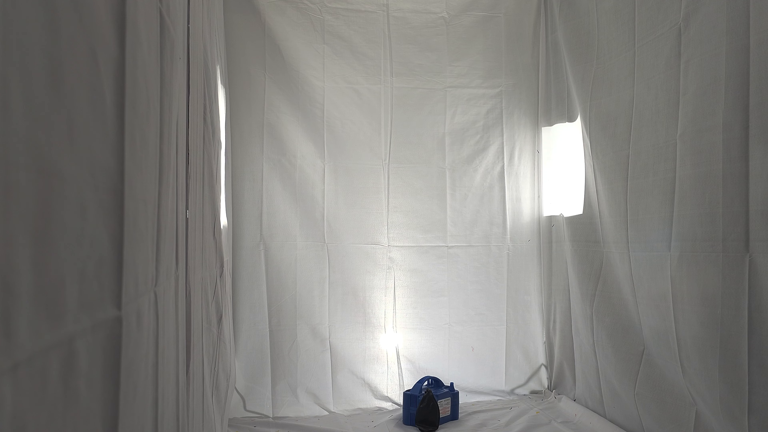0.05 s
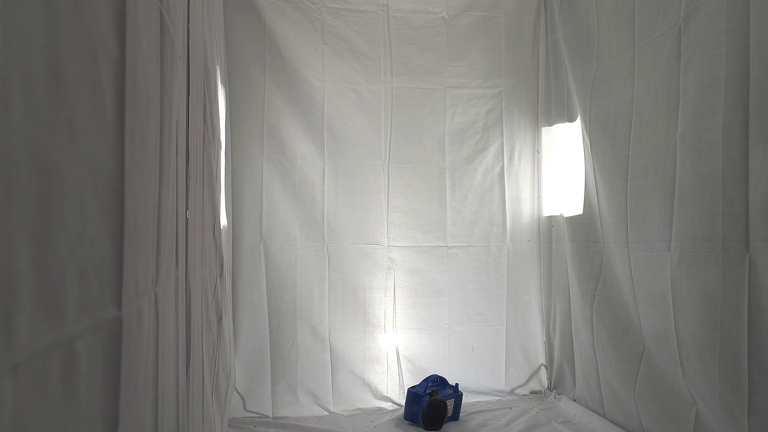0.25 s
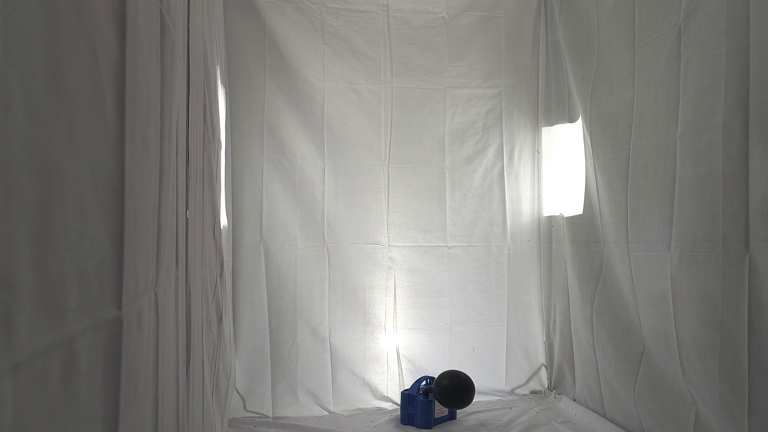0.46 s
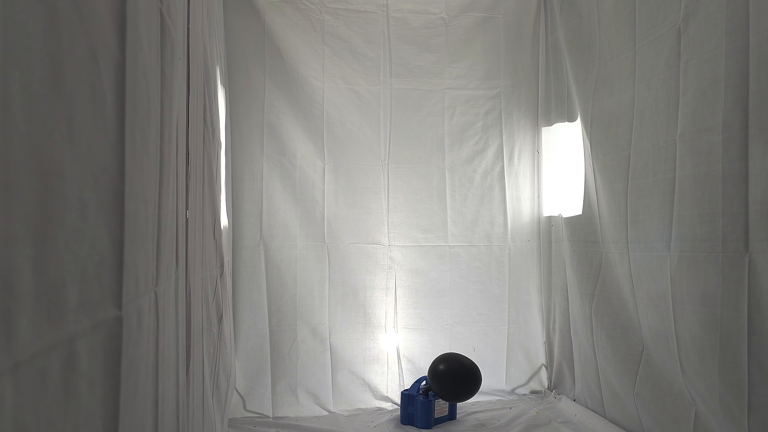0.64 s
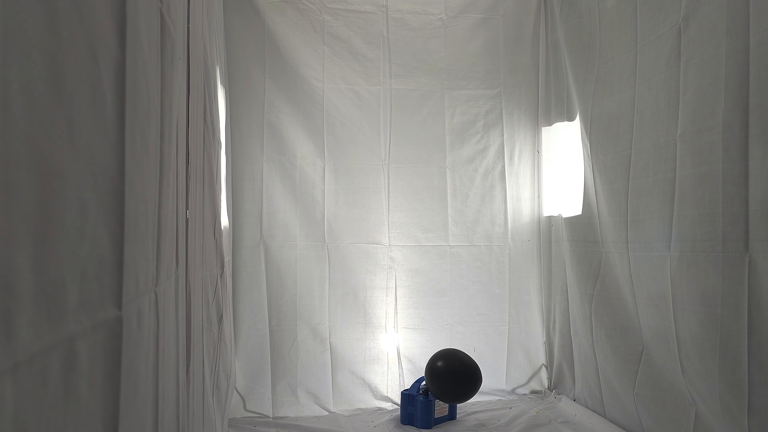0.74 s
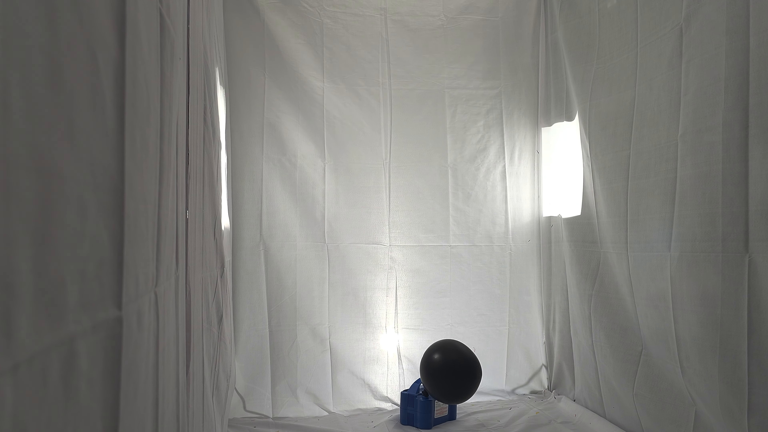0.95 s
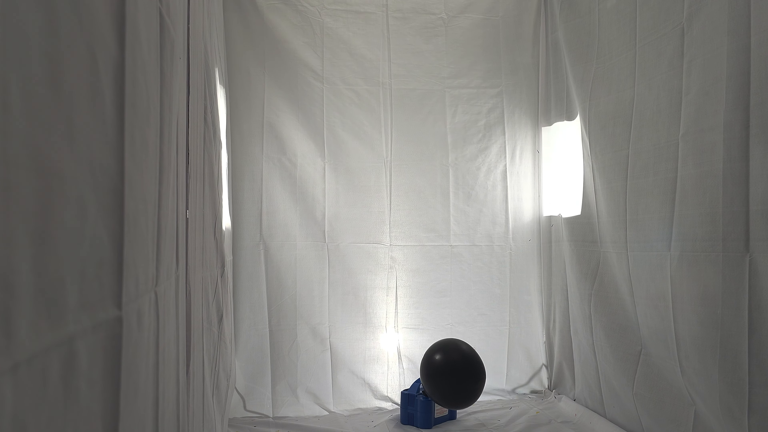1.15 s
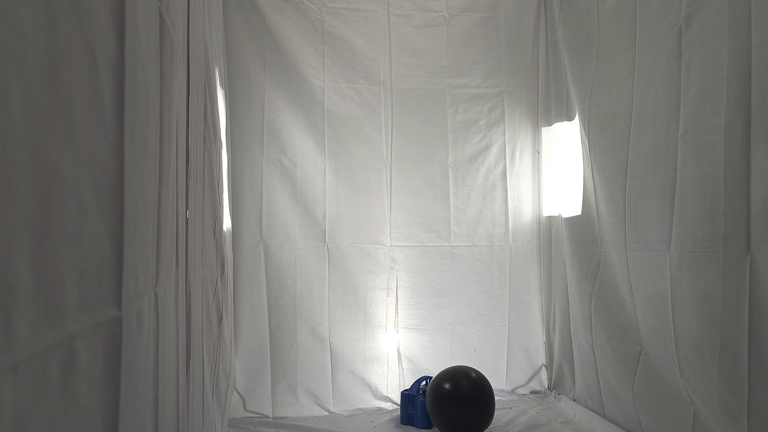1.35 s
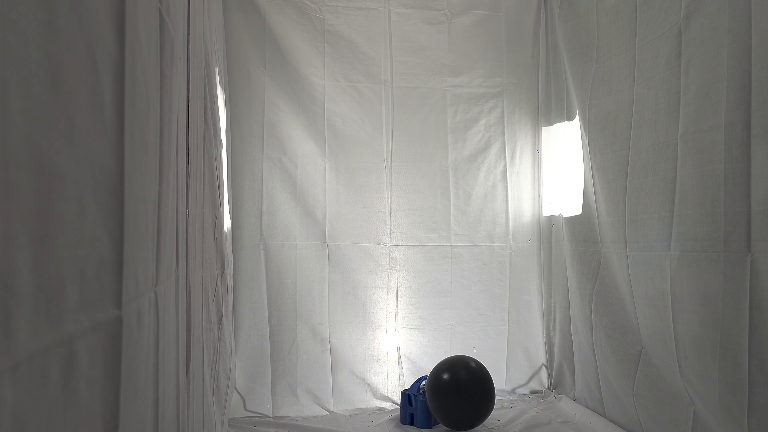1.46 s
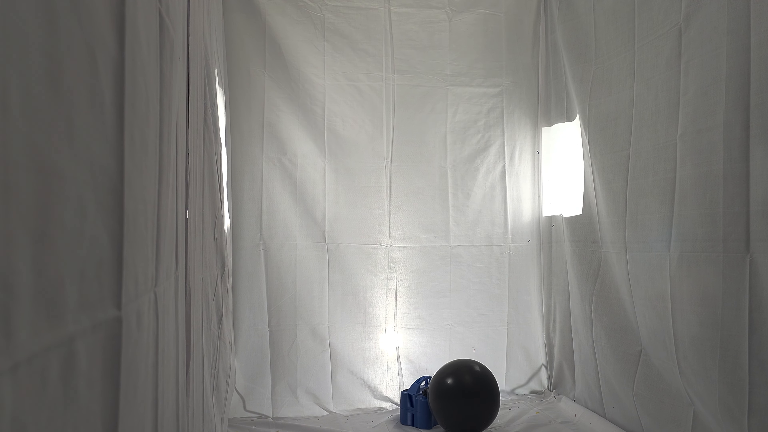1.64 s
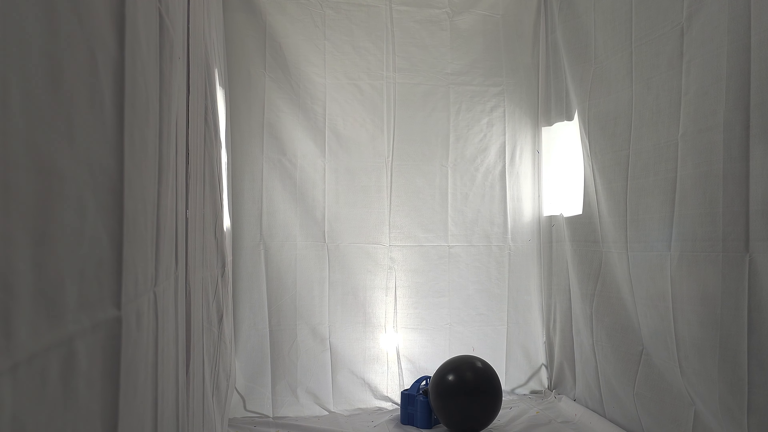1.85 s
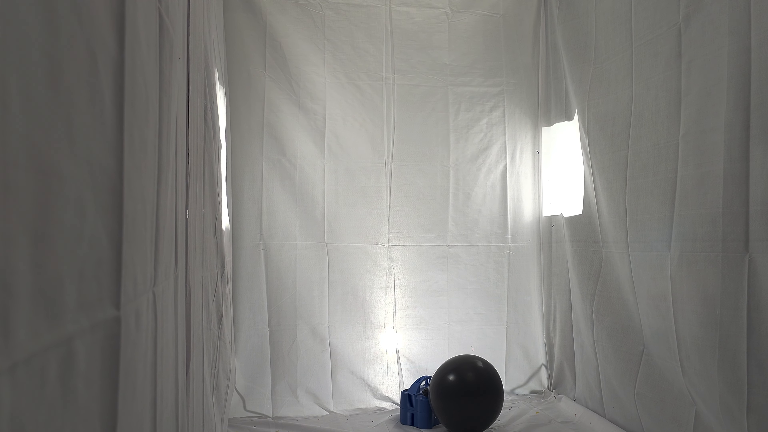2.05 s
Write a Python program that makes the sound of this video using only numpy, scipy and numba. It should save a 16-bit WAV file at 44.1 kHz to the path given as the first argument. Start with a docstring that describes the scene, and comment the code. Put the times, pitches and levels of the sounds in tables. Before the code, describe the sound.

An electric air pump starts with a buzz and a rising whine, then roars and hisses shrilly as it fills a balloon. After about a second the motor winds down and the air fades, in a small, dry-sounding room.

```python
"""An electric air pump fills a balloon in a small curtained room.
Its motor starts with a mains buzz and a rising whine, runs for most of a second and coasts down.
Air roars in the housing, hisses from the outlet and, at full flow, shrills through the nozzle.
The slack balloon flaps upright; as it swells, its resonances sink through the hiss.
A faint low rumble lies underneath."""
import sys
import numpy as np
from scipy import signal
from scipy.fft import rfft, irfft
from scipy.io import wavfile
from numba import njit

SR = 44100
rng = np.random.default_rng(int(sys.argv[2]) if len(sys.argv) > 2 else 0)


def persist_wave(psi):
    """Save psi, clipped to +-1, as 16-bit WAV."""
    counts = np.round(np.clip(psi, -1, 1) * 32767).astype(np.int16)
    wavfile.write(sys.argv[1], SR, np.atleast_2d(counts).T)


N = 92610
TIME = np.arange(N) / SR

# How fast the motor spins. Each row: time in seconds, turns per second.
SHAFT_SPEED = [(.14, 30), (.155, 85), (.18, 190), (.225, 325), (.27, 415), (.35, 519), (.45, 605),
               (.6, 665), (.8, 705), (.98, 718), (1.05, 683), (1.2, 612), (1.3, 563), (1.43, 518),
               (1.56, 481), (1.7, 446), (1.85, 411), (2.1, 365)]
# How loud each part of the motor's sound is. Each row: time in seconds, level in dB.
ROTOR_LEVEL = [(.15, -28), (.24, -36.5), (.28, -23), (.36, -18), (.45, -26), (.7, -27.5), (.95, -23),
               (1.17, -34), (1.28, -26.5), (1.46, -22.5), (1.56, -34.5), (1.82, -38), (2.1, -42)]
OVERTONE_LEVEL = [(.15, -36), (.3, -35), (.6, -36), (1.3, -35), (1.48, -33), (1.62, -33.5), (1.73, -44.5),
                  (1.85, -54), (2.1, -58)]
WHINE_LEVEL = [(.14, -26), (.175, -20), (.195, -16), (.21, -12.5), (.228, -4.5), (.245, -16.5),
               (.265, -25.5), (.315, -25), (.36, -34), (.6, -60)]
HUM_LEVEL = [(.14, -24), (.18, -23), (.25, -28.5), (.4, -34.5), (.56, -34), (.61, -44), (.95, -51),
             (1.05, -70)]
# The spinning motor's overtones and whine, rising and falling with its speed.
# Each entry: a multiple of the shaft speed.
OVERTONE_MULTIPLES = [3, 7, 9]
WHINE_MULTIPLES = [10, 11, 12, 13, 24]
# The balance of those tones, in the same order. Each entry: relative level in dB.
OVERTONES_DB = [-17, 2.5, 0.5]
WHINE_TONES_DB = [-26, -0.5, 3, -28, -21]
# The hum's tones at 1, 2 and 3 times HUM_HZ. Each entry: relative level in dB.
HUM_TONES_DB = [-3, -15, -18]

# How each rush of air, and the rumble, swells and fades. Each row: time in seconds, level in dB.
INTAKE_LEVEL = [(.15, -33.5), (.33, -24.5), (.5, -31), (.75, -39), (1.2, -37.5), (1.5, -33.5), (2.1, -36.5)]
ROAR_LEVEL = [(.15, -21), (.24, -19.5), (.33, -15.5), (.42, -12), (.52, -10.5), (.62, -14.5), (.72, -18),
              (1.0, -20), (1.25, -19), (1.5, -19), (1.8, -25), (2.1, -25.5)]
NOZZLE_LEVEL = [(.15, -24), (.32, -19.5), (.55, -18.5), (.69, -10.5), (.9, -9.5), (1.08, -11.5), (1.2, -13),
                (1.33, -15.5), (1.41, -29), (1.6, -27), (1.78, -39.5), (2.1, -40.5)]
HISS_LEVEL = [(0.15, -42.5), (0.214, -25), (0.226, -28.5), (0.306, -20), (0.648, -18), (0.698, -22),
              (0.97, -19.5), (0.98, -17.5), (1.05, -22), (1.062, -18.5), (2.1, -34.5)]
JET_LEVEL = [(.15, -50), (.3, -26), (.52, -21), (.66, -19.5), (.78, -24.5), (1.0, -28.5), (1.28, -28.5),
             (1.45, -43), (2.1, -51)]
RUMBLE_LEVEL = [(.02, -85), (.04, -58), (.09, -49), (.45, -51), (.8, -57), (1.1, -44.5), (1.45, -48),
                (1.8, -60), (2.1, -58)]
# How dull or bright each of those noises is. Each row: frequency in Hz, relative level in dB.
INTAKE_SPECTRUM = [(110, -35), (135, -14), (160, -3), (200, -0.5), (260, -1.5), (310, -3.5), (355, -2.5),
                   (420, 2), (600, 3), (900, -23)]
ROAR_SPECTRUM = [(130, -52), (250, -20), (400, -18.5), (520, -11), (620, -8), (720, 2.5), (860, -1.5),
                 (1020, -1.5), (1250, -6), (1550, -19.5), (2200, -40)]
NOZZLE_SPECTRUM = [(1800, -55), (2500, -14.5), (3100, -4.5), (3520, -4), (3850, -2.5), (4200, -10.5),
                   (5200, -17.5), (7000, -40)]
HISS_SPECTRUM = [(1000, -21), (1750, -10.5), (2100, -1), (2400, -4.5), (3300, -1), (4600, 0), (6000, -1),
                 (7200, -2), (8600, 2), (9800, -3.5), (11500, -8), (13500, -8.5), (16000, -15.5)]
JET_SPECTRUM = [(400, -8), (1300, 5.5), (1700, -1.5), (2080, 6), (2500, 3.5), (5000, -4.5), (10000, 2.5),
                (13000, -1.5), (16000, -3.5)]
RUMBLE_SPECTRUM = [(15, -55), (30, -38), (42, -25), (58, -7), (86, 4.5), (120, -20), (300, -27),
                   (1000, -42), (16000, -43)]
# Narrow steady pitches that colour the roar, the shrill rush of air and the hiss.
# Each row: pitch in Hz, rough width in Hz, relative level in dB.
ROAR_PEAKS = [(740.2, 15, 0), (692.5, 36, 0), (1017, 27, -5), (1129.5, 28, -12.5)]
SHRILL_PEAKS = [(2757, 24, -15), (3155, 52, -4), (3450, 26, -3), (3523, 38, -1), (3623, 33, -1.5),
                (3890, 56, -12)]
HISS_PEAKS = [(4470, 140, -2.5), (4710, 120, -7), (7500, 90, -4), (8070, 80, -4.5), (8580, 180, -0.5),
              (12650, 120, -7), (13500, 300, -12)]

# The air in the balloon. Each row: time in seconds, volume in litres.
BALLOON_LITRES = [(.14, .75), (.6, 3.58), (1.0, 6.0), (1.3, 7.4), (1.6, 8.2), (2.1, 8.6)]
# The resonances of a ball of air. Each entry: how many wavelengths fit around it.
WAVES_AROUND_BALLOON = [3.34, 4.51, 5.65, 6.76, 7.85, 8.93, 10.17, 11.33]

SWITCH_ON_S, FADE_IN_S = 0.14, 0.018
HUM_HZ = 100  # twice the mains frequency


def motor():
    """The rotor makes a tone with overtones that follow its speed, and the sliding contacts whine."""
    angle = shaft_angle(jitter=.002)
    rotor = from_db(curve(ROTOR_LEVEL) + 2.8 * drift(36)) * np.sin(angle)
    upper_tones = sum(from_db(db + 1.2 * drift(16)) * np.sin(k * angle)
                      for k, db in zip(OVERTONE_MULTIPLES, OVERTONES_DB))
    overtones = from_db(curve(OVERTONE_LEVEL)) * upper_tones
    contact_angle = shaft_angle(jitter=.0174)
    whine_tones = sum(from_db(db + 2.0 * drift(150)) * np.sin(k * contact_angle)
                      for k, db in zip(WHINE_MULTIPLES, WHINE_TONES_DB))
    # The whine pulses with the electric current.
    current = 1 - .62 * np.cos(2 * np.pi * HUM_HZ * (TIME - SWITCH_ON_S))
    whine = from_db(curve(WHINE_LEVEL)) * rms_one(current * whine_tones)
    return np.sqrt(2) * (rotor + overtones) + whine


def shaft_angle(jitter):
    """How far the shaft has turned, in radians; its speed trembles by the fraction jitter."""
    speed = curve(SHAFT_SPEED) * (1 + jitter * drift(88))
    return 2 * np.pi * np.cumsum(speed) / SR


def mains_hum():
    """The motor's iron buzzes while current flows."""
    tones = sum(from_db(db + 0.85 * drift(6.4)) * np.sin(2 * np.pi * HUM_HZ * k * TIME)
                for k, db in enumerate(HUM_TONES_DB, start=1))
    return from_db(curve(HUM_LEVEL)) * rms_one(tones)


def airflow():
    """Air rushes in, through the pump and out into the balloon, all fluttering with the flow."""
    intake = from_db(curve(INTAKE_LEVEL)) * noise(INTAKE_SPECTRUM)
    roar = air_rush(ROAR_LEVEL, ROAR_SPECTRUM, ROAR_PEAKS, noise_db=-3, peaks_db=-7)
    shrill = air_rush(NOZZLE_LEVEL, NOZZLE_SPECTRUM, SHRILL_PEAKS, noise_db=-6, peaks_db=-8)
    hiss = air_rush(HISS_LEVEL, HISS_SPECTRUM, HISS_PEAKS, noise_db=-.59, peaks_db=-7.5)
    jet = from_db(curve(JET_LEVEL)) * noise(JET_SPECTRUM)
    flutter_db = .73 * drift(108)
    surge_db = .5 * drift(19)
    return (intake + roar + balloon_hollow(shrill + hiss + jet)) * from_db(flutter_db + surge_db)


def air_rush(level, spectrum, peaks, noise_db, peaks_db):
    """Swirling air makes a broad noise, coloured by a few narrow steady pitches."""
    broad = from_db(noise_db) * noise(spectrum)
    narrow = from_db(peaks_db) * narrow_noise(peaks)
    return from_db(curve(level)) * (broad + narrow)


def balloon_hollow(blown_air, width_hz=110, ring_gain=1.25, sound_m_per_s=343):
    """The air inside the balloon rings along, lower and lower as the balloon grows."""
    volume_m3 = curve(BALLOON_LITRES) / 1000
    radius_m = np.cbrt(3 * volume_m3 / (4 * np.pi))
    decay = np.exp(-np.pi * width_hz / SR)
    ring = sum(moving_resonance(blown_air, waves * sound_m_per_s / radius_m / SR, decay)
               for waves in WAVES_AROUND_BALLOON)
    return blown_air + ring_gain * ring


def balloon_flap(start_s=.346, rise_s=.0067, fall_s=.02, pitch_hz=277, width_hz=94, level_db=-20):
    """The slack rubber fills out and flaps upright with a short, low sound."""
    age = TIME - start_s
    rise = np.clip(age / rise_s, 0, 1)
    fall = np.exp(-(np.maximum(age - rise_s, 0) / fall_s) ** 2)
    return from_db(level_db) * rise * fall * narrow_noise([(pitch_hz, width_hz, 0)])


def room(sound, first_echo_s=.0059, fade_60_db_s=.13, echo_db=-9.5):
    """The curtained room adds a blur of echoes that dies quickly."""
    t = TIME[:SR // 2]
    tail = rng.standard_normal(len(t)) * from_db(-60 * t / fade_60_db_s) * (t > first_echo_s)
    echoes = signal.fftconvolve(sound, tail / np.linalg.norm(tail))[:N]
    echo_gain = from_db(echo_db)
    return (sound + echo_gain * echoes) / np.sqrt(1 + echo_gain ** 2)


def rumble():
    """A faint low noise swells and fades in the background."""
    return from_db(curve(RUMBLE_LEVEL)) * noise(RUMBLE_SPECTRUM)


def from_db(db):
    """Turn decibels into a number to multiply by."""
    return 10 ** (np.asarray(db) / 20)


def rms_one(x):
    """Scale a signal to an average power of 1."""
    return x / np.sqrt(np.mean(x ** 2) + 1e-20)


def curve(rows):
    """Join (time, value) points with straight lines."""
    return np.interp(TIME, *np.transpose(rows))


def drift(rate_hz):
    """A random wobble of typical size 1; a higher rate wobbles faster."""
    decay = np.exp(-2 * np.pi * rate_hz / SR)
    wobble = signal.lfilter([1], [1, -2 * decay, decay * decay], rng.standard_normal(N + SR))
    return rms_one(wobble)[SR:]


def noise(spectrum):
    """Noise of power 1, shaped to the given spectrum."""
    hz, db = np.transpose(spectrum)
    bin_hz = np.maximum(np.fft.rfftfreq(N, 1 / SR), 1)
    gains = from_db(np.interp(np.log(bin_hz), np.log(hz), db))
    return rms_one(irfft(rfft(rng.standard_normal(N)) * gains, N))


def narrow_noise(peaks):
    """Narrow bands of noise, one per peak, with a total power of 1."""
    total = 0
    for hz, width_hz, db in peaks:
        decay = np.exp(-np.pi * 1.5 * width_hz / SR)  # 1.5 times wider, as filtering twice narrows it
        band = [1, 0, -1, 1, -2 * decay * np.cos(2 * np.pi * hz / SR), decay * decay]
        total += from_db(db) * rms_one(signal.sosfilt([band, band], rng.standard_normal(N)))
    return rms_one(total)


@njit
def moving_resonance(x, radians_per_sample, decay):
    """A filter that passes one narrow band, whose pitch can slide."""
    band, state = np.zeros(len(x)), 0j
    for i in range(len(x)):
        state = state * decay * np.exp(1j * radians_per_sample[i]) + (1 - decay) * x[i]
        band[i] = 2 * state.real
    return band


def scene():
    """The pump starts and fills the balloon over the rumble, in one channel."""
    fade_in = np.clip((TIME - SWITCH_ON_S) / FADE_IN_S, 0, 1)
    background = rumble()
    pump = fade_in * (motor() + airflow())
    return (room(pump + balloon_flap()) + fade_in * mains_hum() + background)[None]


def record(dry, ceiling=.96, cutoff_hz=15750):
    """Round off the loudest peaks and cut the highest treble."""
    rounded = dry / (1 + (dry / ceiling) ** 4) ** (1 / 4)
    low_pass = signal.ellip(12, .1, 80, cutoff_hz, fs=SR, output="sos")
    return signal.sosfilt(low_pass, rounded)


dry = scene()
out = record(dry)
persist_wave(out)
```